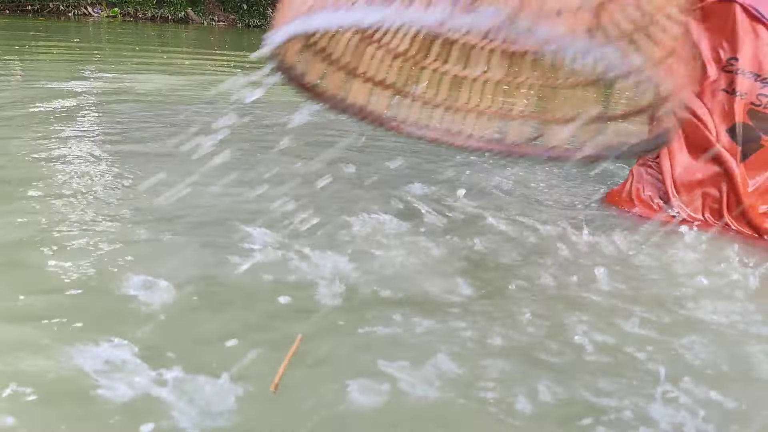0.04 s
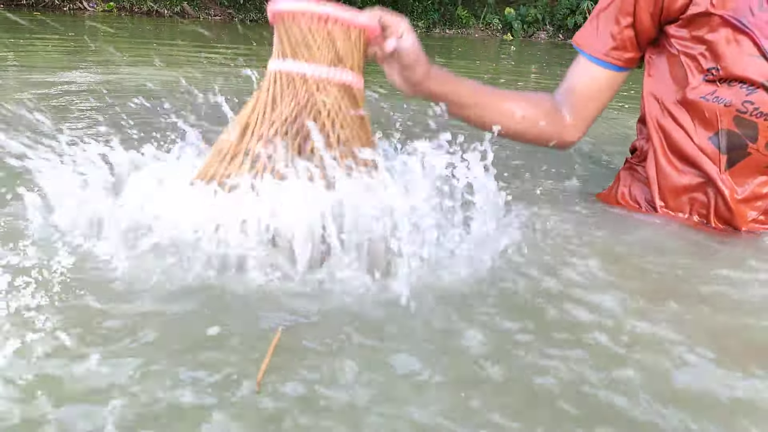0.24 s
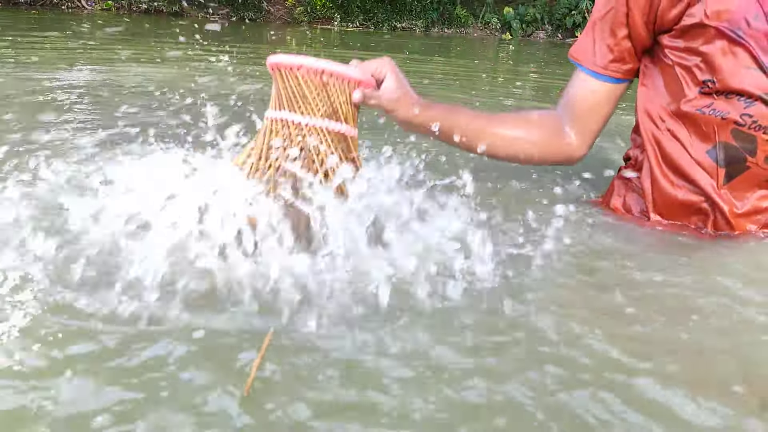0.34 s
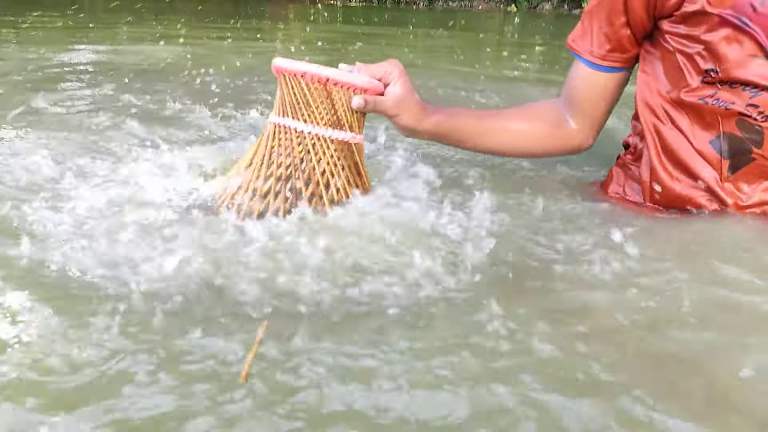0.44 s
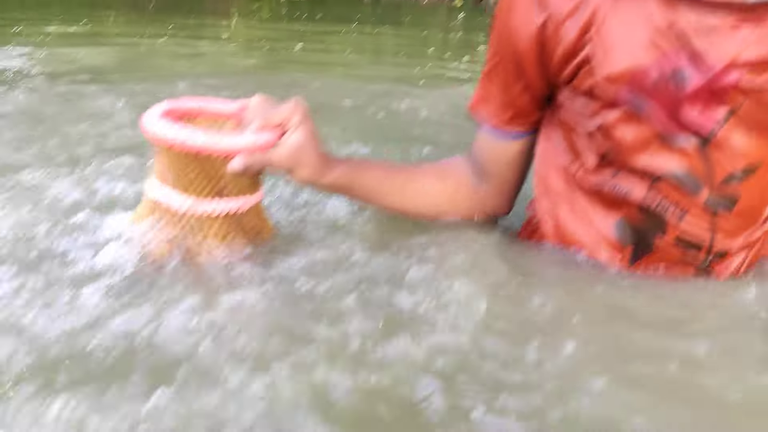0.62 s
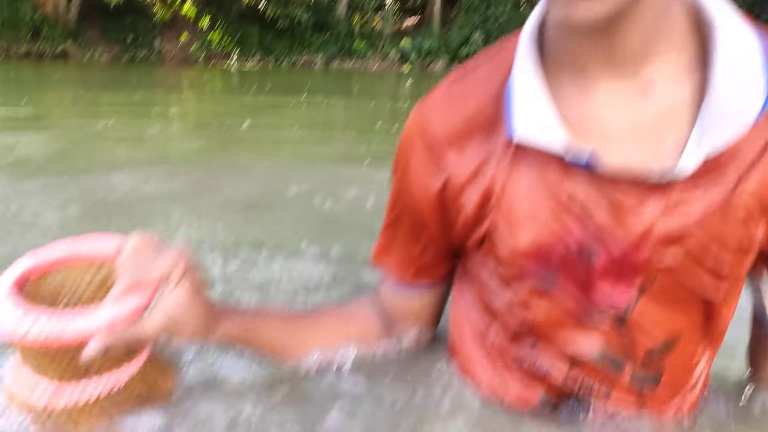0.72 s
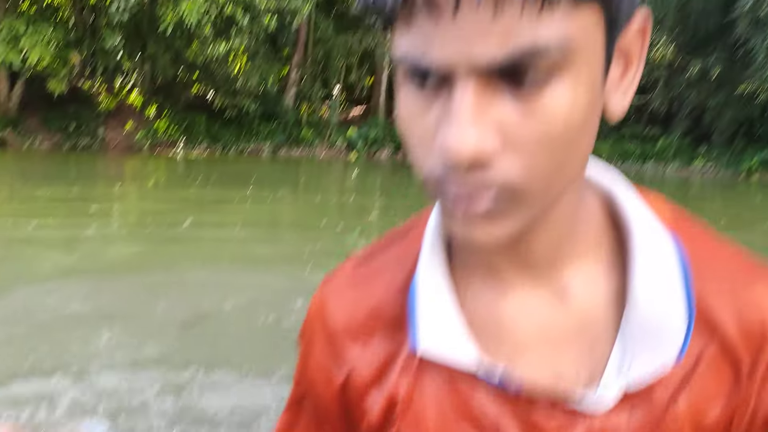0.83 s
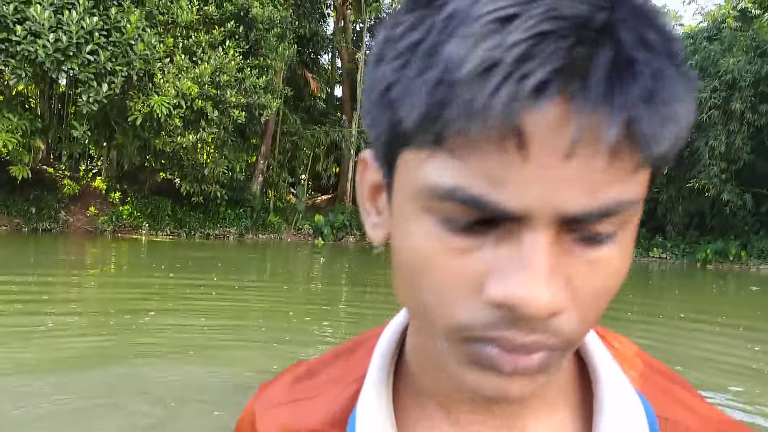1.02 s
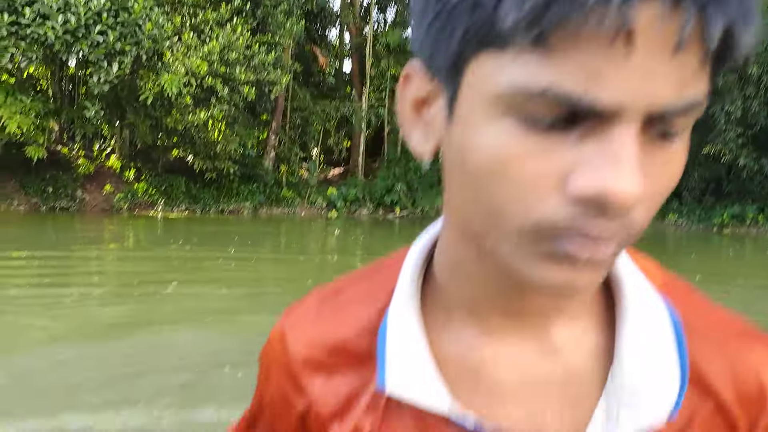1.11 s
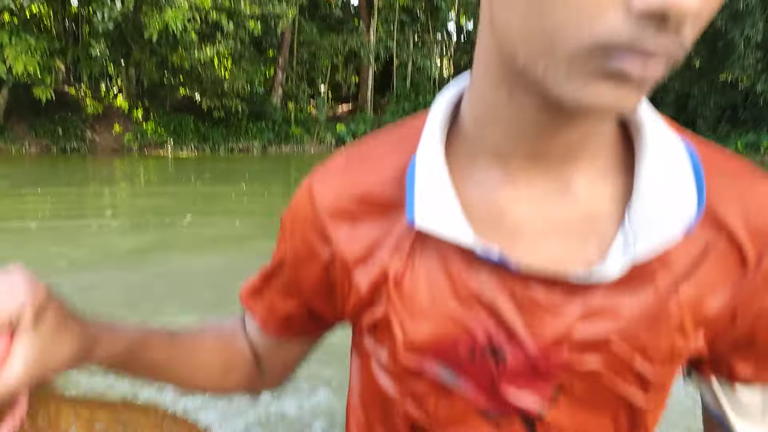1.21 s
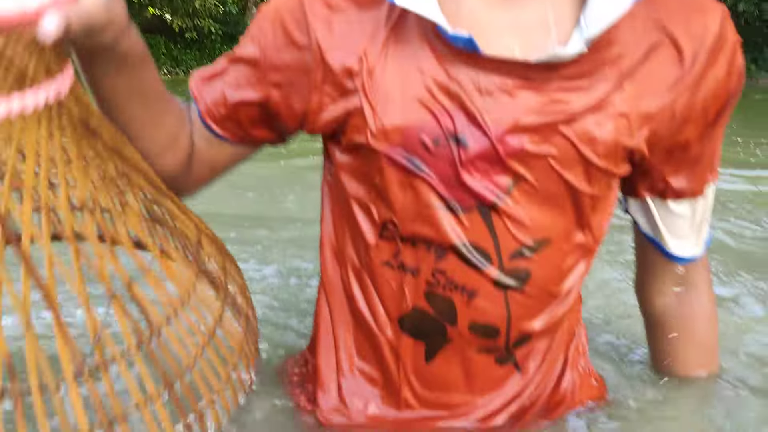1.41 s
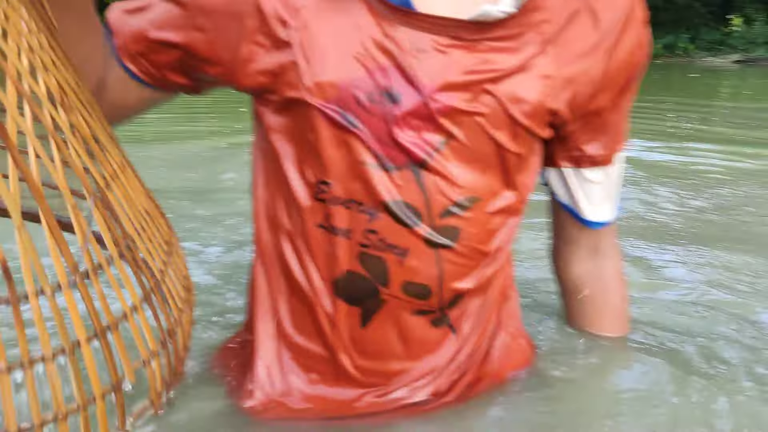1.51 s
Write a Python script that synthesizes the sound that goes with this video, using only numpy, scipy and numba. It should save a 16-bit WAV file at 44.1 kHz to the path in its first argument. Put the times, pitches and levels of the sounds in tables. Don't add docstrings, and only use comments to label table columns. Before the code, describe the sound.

One close watery plunge with a hollow gulp and spray, fading into sparse drips on a quiet river

```python
import sys
import numpy as np
from scipy import signal
from scipy.fft import rfft, irfft
from scipy.io import wavfile
from scipy.ndimage import uniform_filter1d
from numba import njit

SR = 44100
rng = np.random.default_rng(int(sys.argv[2]) if len(sys.argv) > 2 else 0)


def int16_out(signal):
    q = np.round(np.clip(np.atleast_2d(signal).T, -1, 1) * 32767)
    wavfile.write(sys.argv[1], SR, q.astype(np.int16))


def field_ratio(decibels):
    return 10 ** (np.asarray(decibels, dtype=float) / 20)


N = 68355

# frequency in Hz, level in dB.
RIVER_COLOUR = [(71, -36), (120, -11.5), (655, -23.5), (835, -31.5), (3650, -17), (10000, -34.5),
                (12800, -24), (14100, -28), (15000, -36)]
# time in seconds, gust level in dB, left minus right in dB.
BREEZE_STRENGTH = [(0.0, -53.5, -16), (0.042, -59.5, -0.5), (0.448, -55.5, -14), (0.594, -28, -18),
                   (0.646, -57, -7), (0.728, -52, -17), (0.794, -57, -2), (0.836, -52.5, -19),
                   (1.056, -57.5, -11), (1.112, -51.5, 7), (1.174, -56, -7), (1.256, -55, 6),
                   (1.324, -50.5, -16), (1.36, -59, -6), (1.416, -53, -8), (1.446, -48, 0.5),
                   (1.488, -50, -15), (1.55, -58.5, -1.0)]
# frequency in Hz, level in dB per Hz.
GUST_COLOUR = [(8.8, -18.5), (15, -3), (30, 0), (222, -24), (254, -15.5), (326, -30), (400, -48),
               (520, -67), (880, -120)]
# time in seconds, peak in dB, pitch in Hz.
TRICKLE_BUBBLES = [(.003, -51, 2250), (.008, -54, 1750), (.021, -53, 3300), (.1425, -51, 6100),
                   (.1655, -46, 3550), (.522, -41, 8600), (.566, -46, 2600), (.615, -50, 2300),
                   (.695, -55, 2300), (.87, -57, 1400), (.947, -56, 4600), (1.186, -49, 1410),
                   (1.295, -55, 3300), (1.308, -52, 1250), (1.335, -54, 3700), (1.375, -53, 2200),
                   (1.395, -53, 2000), (1.437, -51, 3500), (1.487, -47, 3250), (1.488, -50, 2550),
                   (1.499, -52, 2450), (1.508, -51, 3200), (1.529, -51, 6300), (1.542, -52, 3600)]
# time in seconds, peak in dB, pitch in Hz.
LARGE_BUBBLES = [(0.592, -42, 478), (0.611, -47, 970), (0.694, -44.5, 965), (0.738, -46.5, 710),
                 (0.841, -55, 620), (0.874, -47, 890), (0.905, -52, 640), (0.948, -58, 820),
                 (1.008, -43, 833), (1.04, -50, 980), (1.118, -52, 670), (1.147, -55, 710),
                 (1.186, -45, 852), (1.305, -53.5, 490)]
# time in seconds, peak in dB, pitch in Hz, splat relative to peak in dB.
FALLING_DROPS = [(0.0004, -42, 7400, -12), (0.0133, -61, 3450, -13), (0.0581, -46.5, 4200, -9.5),
                 (0.0618, -49, 3700, -11), (0.0704, -51, 3340, -3.5), (0.1083, -49.5, 3420, -6),
                 (0.126, -53.5, 3360, 3), (0.139, -46, 3920, -4), (0.1430, -47.5, 2960, -9.5),
                 (0.1662, -61, 3450, 18.5), (0.1905, -57, 3250, 9.5), (0.2097, -43, 3370, 5),
                 (0.2433, -40, 4180, 3), (0.5301, -29, 2600, -20), (0.5574, -54.5, 2430, 5),
                 (0.5921, -41.5, 3640, -8), (0.6794, -63, 3170, -8), (0.8939, -44.5, 3330, -22),
                 (0.9393, -46, 3670, -23), (0.995, -49.5, 2930, -5), (1.07, -39.5, 3630, -15),
                 (1.2378, -54.5, 3190, -23), (1.4028, -43.5, 5400, -14), (1.4470, -46, 3280, -0.5)]
# time in seconds, spray in dB, churn in dB, mist relative to spray in dB.
WATER_EFFORT = [(0, -51, -54.5, -5), (.025, -65, -71, -5.5), (.197, -71.5, -67.5, 6), (.208, -51, -68, 4.5),
                (.25, -37, -46.5, -1), (.276, -38.5, -29, -4), (.31, -33.5, -29, -5),
                (.336, -31.5, -24.5, -8.5), (.358, -36, -31, -7.5), (.39, -38.5, -37.5, -11),
                (.44, -43.5, -36, -5), (.5, -42, -42.5, -5), (.545, -50, -45.5, -5.5),
                (.65, -58.5, -54.5, -6.5), (.78, -59, -61.5, -6.5), (1.29, -67.5, -65.5, -0.5),
                (1.39, -55.5, -60.5, -7), (1.55, -55.5, -57.5, -8)]
# frequency in Hz, level in dB per Hz.
MIST_COLOUR = [(4500, -5), (6500, -2), (10000, -10), (12500, -6), (14200, -3.5), (15000, -35)]
# frequency in Hz, level in dB per Hz.
SPRAY_COLOUR = [(880, -19), (1500, -3.5), (2080, -1.5), (4630, -4), (5150, -9.5), (9820, -13), (13600, -37),
                (14600, -50), (15000, -40)]
# frequency in Hz, level in dB per Hz.
CHURN_COLOUR = [(130, -36), (220, -4.5), (437, -8.5), (800, -1.5), (1000, -1), (1450, 0), (2200, -12),
                (3600, -15.5)]
# time in seconds, peak in dB, pitch in Hz, left port ahead in milliseconds.
PLUNGE_BUBBLES = [(0.208, -37.5, 4242, 0.26), (0.21, -33, 3800, 0.31), (0.2127, -29, 4700, 0.31),
                  (0.2134, -33, 3120, 0.36), (0.219, -42, 1959, 0.21), (0.2294, -28, 4370, 0.15),
                  (0.2448, -29.5, 4651, 0.24), (0.2468, -26.5, 4026, 0.17), (0.2494, -33, 1650, 0.32),
                  (0.2703, -34, 930, 0.031), (0.2774, -35, 810, 0.029), (0.2795, -23.5, 1330, 0.12),
                  (0.2868, -30.5, 1410, 0.103), (0.2878, -18.5, 775, 0.36), (0.2993, -28.5, 1060, 0.091),
                  (0.2998, -33, 796, 0.247), (0.3057, -29, 4500, 0.16), (0.3176, -25, 4200, 0.267),
                  (0.3253, -29, 800, 0.52), (0.3277, -19, 1570, 0.41), (0.3314, -22.7, 1280, 0.101),
                  (0.3327, -19, 1890, 0.28), (0.3368, -30, 4586, 0.745), (0.3692, -43, 968, 0.058),
                  (0.3708, -26, 1700, 0.26), (0.3737, -28, 1480, 0.189), (0.387, -26, 1750, 0.41),
                  (0.3987, -23, 1640, 0.32), (0.3985, -43, 3270, 0.16), (0.4036, -31, 3300, 0.14),
                  (0.4146, -38, 947, 0.14), (0.4136, -34, 1690, 0.31), (0.418, -29.5, 1210, 0.089),
                  (0.422, -24.5, 1490, 0.256), (0.4215, -35, 565, 0.49), (0.4425, -30.1, 1540, 0.23),
                  (0.4575, -32, 818, 0.11), (0.4615, -36, 1670, 0.32), (0.4754, -40, 1610, 0.25),
                  (0.4803, -34, 3962, 0.17), (0.4835, -35.5, 855, 0.098), (0.4908, -34, 1540, 0.28),
                  (0.5156, -29.5, 1680, 0.27), (0.523, -36.4, 1610, 0.302)]
# time in seconds, peak in dB, pitch in Hz.
HOOP_SLAPS = [
    (.2772, -25, 1200),
    (.2986, -19.5, 1070),
    (.3245, -16, 875),
    (.334, -31, 1360),
]
# frequency in Hz, left minus right in dB.
PORT_DIFFERENCE = [(110, 5), (300, -3), (560, 0.5), (880, 3.5), (1200, -1.5), (1600, -8.5), (2000, 0.5),
                   (3200, -5), (4300, -8), (7910, 13), (14600, 1.5)]

LAG_S, LAG_SPREAD_S = -0.0003385, 0.0001996
RISE_PER_CYCLE = 0.0099
SWELL_CYCLES = 3.0
POP_S, POP_DB, POP_WIDTH_S = .5833, -21, .0007
POP_RING_S, POP_RING_DB, POP_HZ, POP_T60_S = .5895, -25, 64, .13
POP_SINK_S, POP_SINK_DB, POP_SINK_WIDTH_S = .605, -28, .005
GULP_S, GULP_DB, GULP_ATTACK_S, GULP_T60_S, GULP_ROUGH_DB = .3238, -19, .0012, .085, 1.5
GULP_FROM_HZ, GULP_TO_HZ, GULP_FALL_S = 600, 240, .009
BURST_T60_S, BURST_SWELL = 0.018, 2.486


def shape(x, table, scale=1):
    hz, db = np.array(table, float).T
    f = np.maximum(np.fft.rfftfreq(N, 1 / SR), 1)
    gain_db = scale * np.interp(np.log(f), np.log(hz), db)
    return irfft(rfft(x) * field_ratio(gain_db), N)


def curve(table, axis):
    table = np.array(table, float)
    return np.interp(np.arange(N) / SR, table[:, 0], table[:, axis])


def unit(x):
    return x / np.sqrt(np.mean(x ** 2))


def walk(rate):
    k = int(SR / rate)
    smooth = uniform_filter1d(rng.standard_normal(N), k)
    return unit(uniform_filter1d(smooth, k))


@njit
def ring(start, hz, t60, size, rise, lag, swell, n, sr):
    out = np.zeros((2, n))
    for j in range(len(start)):
        for c in range(2):
            at = (start[j] + lag[j] * (1 - c)) * sr
            i = int(at) + 1
            step = 2 * np.pi * hz[j] / sr
            fade = np.exp(-np.log(1000.) / (t60[j] * sr))
            phase = step * (i - at)
            a = size[j]
            while i < n and a > size[j] * .003:
                if i >= 0:
                    out[c, i] += a * np.sin(phase) * min(phase / (2 * np.pi * swell), 1.) ** 2
                phase += step
                a *= fade
                step = min(step * (1 + rise * step / (2 * np.pi)), 2.5)
                i += 1
    return out


def drops(table, gain_db, swell, cycles):
    s, db, hz = np.array(table, float).T[:3]
    size = field_ratio(db + gain_db + 60 * swell / cycles)
    start = s - swell / hz / 2
    return ring(start, hz, cycles / hz, size, RISE_PER_CYCLE / 2, LAG_S + 0 * s, swell, N, 1. * SR)


def swarm(count, lo_hz, hi_hz, cycles, hiss_db, lag_share=0.921):
    when, pitch, chance = rng.random((count, 3)).T
    ring_spread, lag_spread = rng.standard_normal((count, 2)).T
    hz = lo_hz * (hi_hz / lo_hz) ** pitch
    size = field_ratio(-1.7 * np.log(1 - chance)) * hz / 1000
    t60 = cycles * np.exp(0.46 * ring_spread) / hz
    lag = lag_share * LAG_S + LAG_SPREAD_S * lag_spread
    crowd = ring(when * N / SR, hz, t60, size, RISE_PER_CYCLE, lag, 1.21, N, 1. * SR)
    hiss = field_ratio(hiss_db) * rng.standard_normal((2, N))
    return (unit(crowd) + hiss) * field_ratio(1.6 * walk(67))


def mirrored(x):
    return x - field_ratio(-11) * np.roll(x, int(.00068 * SR), axis=1)


def river():
    mid = rng.standard_normal(N)
    apart = rng.standard_normal((2, N))
    shared = np.array([np.roll(mid, int(LAG_S * SR)), mid])
    mix = shape(shared, [(400, -2.5), (2500, -12.5)]) + shape(apart, [(150, -1.5), (1000, -18.5)])
    return unit(shape(mix, RIVER_COLOUR)) * field_ratio(-60 + 0.21 * walk(8.2))


def membrane_pop():
    t = np.arange(N) / SR
    late = t - POP_RING_S
    push = field_ratio(POP_DB) * np.exp(-((t - POP_S) / POP_WIDTH_S) ** 2)
    swing = field_ratio(POP_RING_DB - 60 * np.abs(late) / POP_T60_S) * np.sin(2 * np.pi * POP_HZ * late)
    sink = field_ratio(POP_SINK_DB) * np.exp(-((t - POP_SINK_S) / POP_SINK_WIDTH_S) ** 2)
    return (push - swing - sink) * np.array([[0], [1]])


def breeze():
    side = curve(BREEZE_STRENGTH, axis=2) / 2 * np.array([[1], [-1]])
    gust_db = np.minimum(curve(BREEZE_STRENGTH, axis=1), -52)
    db = gust_db + side - np.abs(side) + np.array([[6.0], [7.5]])
    rumble = shape(rng.standard_normal((2, N)), list(GUST_COLOUR) + [(1500, -63)])
    return unit(rumble) * field_ratio(db) + membrane_pop()


def trickle():
    return drops(TRICKLE_BUBBLES, gain_db=5, swell=SWELL_CYCLES, cycles=23)


def plops():
    return drops(LARGE_BUBBLES, gain_db=1.5, swell=SWELL_CYCLES, cycles=22.0)


def drips():
    return drops(FALLING_DROPS, gain_db=1.0, swell=2 * SWELL_CYCLES, cycles=36)


def splats():
    s, db, _, rel_db = np.array(FALLING_DROPS, float).T[:, :, None]
    bump = np.exp(-((np.arange(N) / SR - s) / 0.0014 - 1) ** 2)
    env = (field_ratio(db + rel_db - 0.5) * bump).sum(0)
    colour = [(2000, -23), (3600, 7.5), (5200, 3.5), (8000, 5.5), (14000, -4)]
    return env * unit(shape(rng.standard_normal((2, N)), colour))


def splash():
    spray = swarm(count=14000, lo_hz=1200, hi_hz=7070, cycles=10.2, hiss_db=-6)
    mist = swarm(count=12000, lo_hz=5450, hi_hz=14300, cycles=9.3, hiss_db=5.5)
    churn = swarm(count=9000, lo_hz=252.2, hi_hz=3054, cycles=13.4, hiss_db=-10, lag_share=0.55)
    spray = unit(shape(shape(spray, [(5500, -12.5), (7500, -19)]), SPRAY_COLOUR))
    mist = unit(shape(mist, MIST_COLOUR)) * field_ratio(curve(WATER_EFFORT, axis=3))
    churn = unit(shape(churn, CHURN_COLOUR)) * field_ratio(curve(WATER_EFFORT, axis=2))
    return (spray + mist) * field_ratio(curve(WATER_EFFORT, axis=1)) + churn


def bursts():
    s, db, hz, ahead_ms = np.array(PLUNGE_BUBBLES, float).T
    t60 = BURST_T60_S * np.sqrt(1000 / hz)
    size = field_ratio(db + 1.5 + 60 * BURST_SWELL / hz / t60)
    start = s - (BURST_SWELL + 0.78) / hz
    return ring(start, hz, t60, size, RISE_PER_CYCLE, -ahead_ms / 1000, BURST_SWELL, N, 1. * SR)


def slaps():
    return drops(HOOP_SLAPS, gain_db=0.0, swell=0.63, cycles=7.9)


def gulp():
    t = np.maximum(np.arange(N) / SR - GULP_S - np.array([[LAG_S], [0]]), 0)
    fall = (GULP_FROM_HZ - GULP_TO_HZ) * GULP_FALL_S * (1 - np.exp(-t / GULP_FALL_S))
    turns = GULP_TO_HZ * t + fall
    size = field_ratio(GULP_DB - 60 * t / GULP_T60_S + GULP_ROUGH_DB * walk(170))
    first = size * np.minimum(t / GULP_ATTACK_S, 1) * np.sin(2 * np.pi * turns)
    again = drops([(.3425, -30, 250)], gain_db=0, swell=0.89, cycles=13)
    return first + again


def scattered(x):
    t = np.arange(4096) / SR
    tail = rng.standard_normal((2, 4096)) * field_ratio(-60 * t / .03) * (t > .002)
    tail = tail / np.sqrt((tail ** 2).sum(1, keepdims=True))
    return field_ratio(-11) * signal.fftconvolve(x, tail, axes=1)[:, :N]


def scene():
    near = trickle() + plops() + drips() + splats()
    near = near + mirrored(splash()) + bursts() + slaps()
    near = near + scattered(near)
    water = mirrored(river()) + near + gulp()
    left = shape(water[0], PORT_DIFFERENCE, 0.46)
    right = shape(water[1], PORT_DIFFERENCE, -0.47)
    return np.array([left, right]) + breeze()


def top_cut(x):
    return signal.sosfilt(signal.butter(12, 15160, fs=SR, output="sos"), x)


def record(dry):
    low_pass = signal.ellip(10, .3, 70, 14200, fs=SR, output="sos")
    high_pass = signal.butter(1, 8, "high", fs=SR, output="sos")
    mix = signal.sosfilt(high_pass, signal.sosfilt(low_pass, dry))
    return top_cut(mix)


dry = scene()
out = record(dry)
int16_out(out)
```